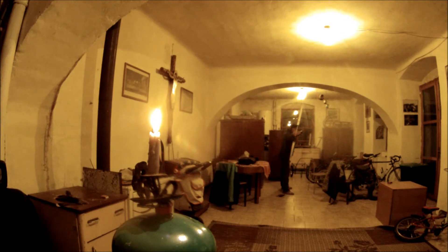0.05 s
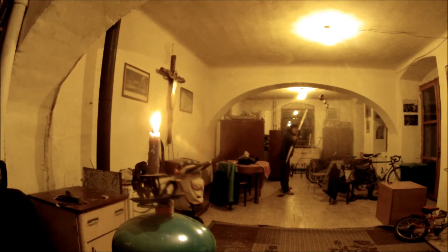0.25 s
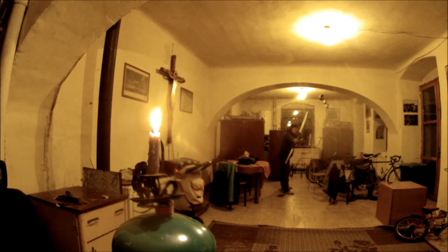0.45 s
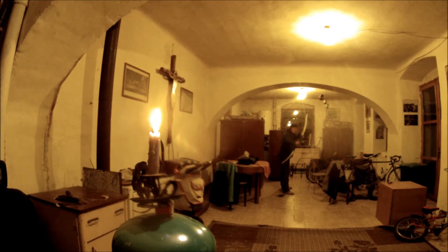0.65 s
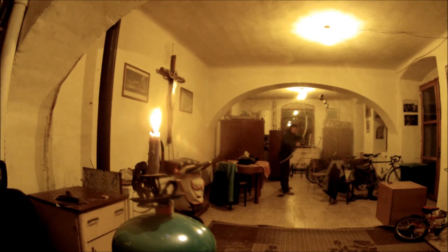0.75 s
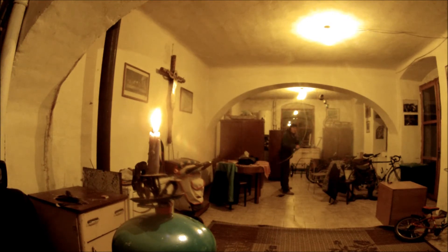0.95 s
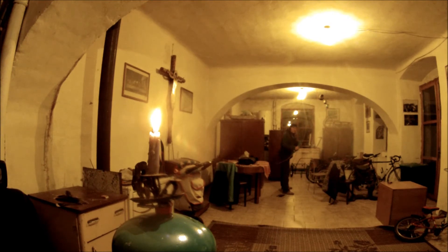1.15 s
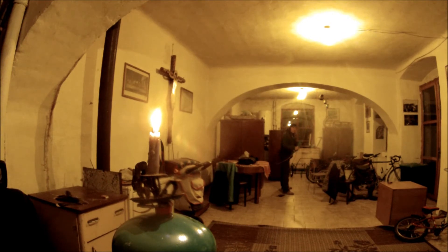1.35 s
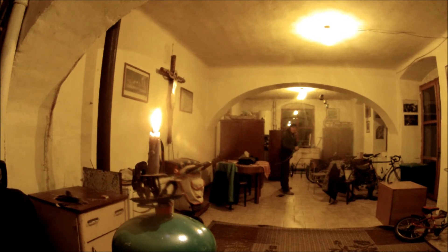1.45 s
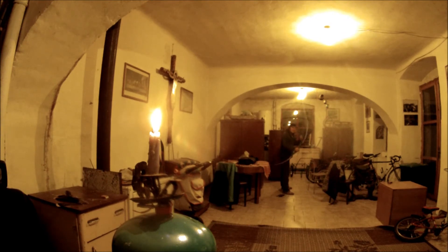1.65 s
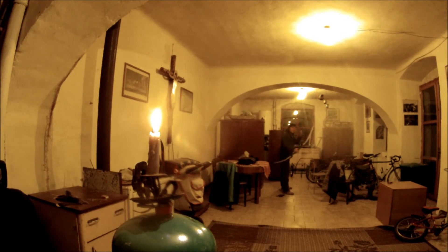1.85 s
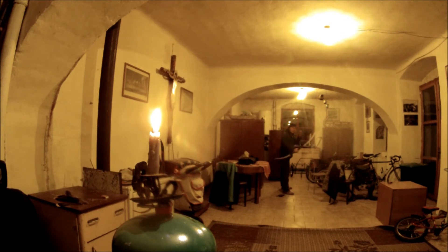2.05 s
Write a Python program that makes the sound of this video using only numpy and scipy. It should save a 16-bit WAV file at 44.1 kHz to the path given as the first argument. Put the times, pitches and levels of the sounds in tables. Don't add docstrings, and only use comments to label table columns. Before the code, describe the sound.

An arrow hits a padded target close to the microphone at about 0.23 s: a violent, clipped crack with a brief hollow boom. Just before, from 0.05 s, a distant bowstring slaps, the shaft rings and limbs knock softly. The vaulted room's echo fades over roughly half a second into low air murmur. Soft low footfalls come around 1.1-1.4 s, then faint cloth rustles and shoe scuffs at 1.5-2.0 s. Gritty, lo-fi camera sound.

```python
import sys
import numpy as np
from scipy import signal
from scipy.fft import rfft, irfft
from scipy.io import wavfile
from scipy.ndimage import uniform_filter1d

SR = 44100
rng = np.random.default_rng(int(sys.argv[2]) if len(sys.argv) > 2 else 0)


def ratio_of_db(decibels):
    return 10 ** (np.asarray(decibels, float) / 20)


def dump(signal):
    limited = np.clip(np.atleast_2d(signal).T, -1, 1)
    pcm = np.round(limited * 32767).astype(np.int16)
    wavfile.write(sys.argv[1], SR, pcm)


N = 92610
T = np.arange(N) / SR
HIT_S, HIT_PUSH_S = .2317, .0027


def noise():
    return rng.standard_normal(N)


def level(x, db):
    return x * ratio_of_db(db) / np.sqrt(np.mean(x ** 2))


def unit_energy(x):
    return x / np.sqrt(np.sum(x ** 2))


def colour(x, table):
    hz = np.maximum(np.fft.rfftfreq(len(x), 1 / SR), 1)
    table_hz, table_db = np.array(table).T
    gain_db = np.interp(np.log(hz), np.log(table_hz), table_db)
    return irfft(rfft(x) * ratio_of_db(gain_db), len(x))


def band(x, hz, width_hz):
    return signal.lfilter(*signal.iirpeak(hz, hz / width_hz, fs=SR), x)


def band_twice(x, hz, width_hz):
    return band(band(x, hz, width_hz), hz, width_hz)


def gate(start_s, length_s, fall=.3, rise=.056):
    u = (T - start_s) / length_s
    return np.clip(u / rise, 0, 1) * np.exp(-np.maximum(u - 1, 0) / fall)


def decay(t, t60_s):
    return np.exp(-np.log(1000) * t / t60_s)


def click(start_s):
    return np.sinc((T - start_s) * SR)


def ring(push, modes):
    body = sum(ratio_of_db(db) * np.sin(2 * np.pi * hz * T) * decay(T, t60_s) for hz, db, t60_s in modes)
    return signal.fftconvolve(push, body)[:N]


def walk(rate_hz):
    k = int(SR / rate_hz)
    return level(uniform_filter1d(uniform_filter1d(noise(), k), k), 0)


def rattle(start_s, length_s, spread_db=5):
    clicks = noise() * ratio_of_db(spread_db * noise())
    since = np.maximum(T - start_s, 0)
    return unit_energy(clicks * (T >= start_s) * np.exp(-(since / length_s) ** 2))


# (t after hit/ms, level/dB)
BITE_JOLTS = [
    (0, -7.5),
    (.25, 3),
    (1.1, -1.5),
    (1.9, -8),
    (2.7, -12.5),
    (3.3, -5),
    (4.4, -15),
]
# (f/Hz, level/dB, t60/s)
TARGET_MODES = [(764, -3, .018), (1520, -1, .011), (1950, -3, .012), (2700, -9, .01), (3700, -9, .013),
                (4350, -14, .01), (5110, -7, .012)]
# (f/Hz, level/dB, t60/s)
PAD_MODES = [(227.5, -10, .06), (300, -22, 0.15), (130, -24.5, .05), (840, -10.5, .03), (1674, -5, .014),
             (3590, -11.5, 0.013), (993.6, -17, .04), (570, -18.5, 0.085), (2550, -5.5, 0.011),
             (896, -17.5, 0.12)]
BITE_DB, CRACK_DB, HIT_LOW_HZ = -4, 2.5, 117


def hit():
    jolts = 0
    for k, (ms, db) in enumerate(BITE_JOLTS):
        jolts = jolts + (-1) ** k * ratio_of_db(db) * click(HIT_S + ms / 1000)
    bite = ratio_of_db(BITE_DB) * ring(jolts, TARGET_MODES)
    crack = ratio_of_db(CRACK_DB) * 10 * band(rattle(HIT_S, HIT_PUSH_S), 2500, 2700)
    high_pass = signal.butter(2, HIT_LOW_HZ, "high", fs=SR, output="sos")
    return signal.sosfilt(high_pass, bite + crack) + ring(click(HIT_S), PAD_MODES)


# (t/s, level/dB, length/s)
SLAP_BURSTS = [
    (.053, -41, 0.015),
    (0.068, -32, 0.024),
    (.095, -40, 0.024),
    (.118, -39, 0.019),
]
# (f/Hz, level/dB)
SLAP_COLOUR = [(35, -34.5), (60, -7), (319, -10.5), (468, -7), (601, -17), (2440, -10), (2900, -14),
               (3580, -16), (5900, -10), (7670, -36.5), (13000, -120)]


def string_slap():
    slap = level(colour(noise(), SLAP_COLOUR), 0) * ratio_of_db(2.5 * walk(200))
    return slap * sum(ratio_of_db(db) * gate(s, length_s, rise=.24) for s, db, length_s in SLAP_BURSTS)


# (f/Hz, level/dB, t60/s)
SHAFT_MODES = [(3579.3, 3.5, .14), (2455, -4.5, .08), (1960, -0.5, 0.092), (3000, -7, 0.043),
               (4649, -8.5, 0.048), (5250, -11.5, 0.031), (1184, -12.5, 0.035)]
SHAFT_S, SHAFT_PUSH_S, SHAFT_DB = .0757, .0039, -34
SHAFT_FREE_S, SHAFT_LEFT_DB = .014, -13


def shaft_ring():
    pushes = click(SHAFT_S) + .77 * click(SHAFT_S + SHAFT_PUSH_S)
    left = ratio_of_db(SHAFT_LEFT_DB) * ratio_of_db(5 * walk(70))
    choke = np.maximum(gate(SHAFT_S, SHAFT_FREE_S, .15), left)
    return ratio_of_db(SHAFT_DB) * ring(pushes, SHAFT_MODES) * choke


# (t/s, level/dB, length/s, centre f/Hz)
LIMB_THUDS = [
    (.066, -43, 0.058, 130),
    (.084, -42.5, .014, 480),
    (.102, -36.5, .022, 465),
    (.104, -39.5, .006, 170),
    (0.127, -38.5, .01, 250),
    (0.156, -39, 0.0089, 249.4),
]


def limb_thuds():
    wood, out = noise(), 0
    for s, db, length_s, hz in LIMB_THUDS:
        out = out + level(band_twice(wood, hz, hz * .35), db) * gate(s, length_s, rise=.3)
    return out


def bow():
    return string_slap() + limb_thuds() + shaft_ring()


# (t/s, level/dB, f/Hz, t60/s, knock level/dB)
FOOTFALLS = [
    (1.108, -54, 35.2, .15, -62),
    (1.19, -47, 49, 0.1, -74),
    (1.266, -59, 42, 0.3, -44.5),
    (1.291, -34, 37.2, 0.3, -48.5),
    (1.346, -46, 66, 0.39, -50.5),
    (1.376, -37, 38, 0.2, -58),
    (1.402, -61, 60, 0.29, -57),
    (1.912, -61, 69.8, 0.18, -55),
]
# (f/Hz, level/dB)
KNOCK_COLOUR = [(30, -11), (60, 8), (130, -2.5), (230, -8.5), (400, -16), (560, -30), (750, -43),
                (6000, -90)]
KNOCK_S = .023


def footsteps():
    knock, out = level(colour(noise(), KNOCK_COLOUR), 0), 0
    for s, db, hz, t60_s, knock_db in FOOTFALLS:
        u = np.maximum(T - s, 0)
        thud = ratio_of_db(db) * np.sin(2 * np.pi * hz * u) * decay(u, t60_s)
        out = out + thud + ratio_of_db(knock_db) * knock * gate(s, KNOCK_S, .764)
    return out


# (t/s, level/dB)
SWAY_LEVEL = [(0, -77), (1.062, -69), (1.14, -52.5), (1.24, -57), (1.31, -55), (1.41, -43.5), (1.55, -48),
              (1.7, -53), (1.79, -54), (1.87, -49.5), (1.99, -45.5), (2.1, -45.5)]
SWAY_HZ = 25.5


def floor_sway():
    hz = SWAY_HZ * (1 + .05 * walk(6))
    tone = np.sin(2 * np.pi * np.cumsum(hz) / SR) * ratio_of_db(2.5 * walk(33))
    at_s, db = np.array(SWAY_LEVEL).T
    return np.sqrt(2) * tone * ratio_of_db(np.interp(T, at_s, db))


# (t/s, level/dB, length/s, main f/Hz, lower f/Hz)
SCUFFS = [
    (1.12, -64, .003, 3000, 1500),
    (1.38, -78, .04, 3500, 2500),
    (1.505, -64, .06, 3544, 2860),
    (1.6, -61.5, .05, 4000, 2778),
    (1.675, -59.5, .055, 4400, 2950),
    (1.74, -60, .06, 4150, 2494),
    (1.845, -55.5, 0.047, 2450, 1291),
    (1.905, -61, .05, 2550, 1250),
    (1.99, -56, 0.042, 2400, 1150),
    (2.028, -69.5, .07, 2500, 1200),
]
RUSTLE_WIDE_DB, RUSTLE_LOW_DB, RUSTLE_HIGH_DB = 4, -2, -2


def rustles():
    grain = noise() * ratio_of_db(.93 * walk(120))
    hiss = level(band(grain, 3300, 4100), RUSTLE_WIDE_DB)
    out = 0
    for s, db, length_s, hz, low_hz in SCUFFS:
        body = level(band_twice(grain, hz, 550), 0)
        body = body + level(band_twice(grain, low_hz, 500), RUSTLE_LOW_DB)
        body = body + level(band(grain, hz * 1.1, 400), RUSTLE_HIGH_DB)
        body = body * ratio_of_db(1.9 * walk(70)) * gate(s, length_s * .71, .45)
        out = out + ratio_of_db(db - 8.5) * gate(s, length_s, .4) * (body + hiss)
    return out


# (f/Hz, t60/s)
REVERB_T60 = [(60, 1.1), (150, 0.58), (300, 0.91), (700, 0.79), (1400, 0.76), (2500, 0.53), (5000, 0.52)]
# (f/Hz, width/Hz, level/dB)
STANDING_WAVES = [(127, 8.1, 3.5), (275.4, 44, 4), (294.3, 10, 4), (530, 41, 1.5), (800, 190, 5.5),
                  (1930, 130, 5)]
ROOM_RISE_S = .006


def room():
    table_hz, table_s = np.array(REVERB_T60).T
    out = 0
    for hz in 35 * 2 ** np.arange(0, 7.6, .5):
        t60_s = np.interp(np.log(hz), np.log(table_hz), table_s)
        out = out + band_twice(noise(), hz, hz / 2) * decay(T, t60_s)
    out = out * (1 - np.exp(-T / ROOM_RISE_S))
    peaks = sum((ratio_of_db(db) - 1) * band(out, hz, width_hz) for hz, width_hz, db in STANDING_WAVES)
    return unit_energy(out + peaks)


# (f/Hz, level/dB)
HIT_ECHO_COLOUR = [(30, -30.5), (120, -7), (300, -8), (450, -13), (780, -11.5), (1950, -15), (2900, -22),
                   (5300, -23)]


def echo_kick():
    kick = colour(click(HIT_S + HIT_PUSH_S), HIT_ECHO_COLOUR)
    return unit_energy(kick) * np.sqrt(.15 * SR)


# (f/Hz, level/dB per Hz)
AIR_COLOUR = [(18, -33), (30, -9), (129, -5), (176, -10), (319, -13.5), (416, -17), (542, -18.5),
              (1710, -25), (5900, -31), (7670, -63), (13000, -120)]
AIR_DB = -59.5


def air():
    return level(colour(noise(), AIR_COLOUR), AIR_DB) * ratio_of_db(.7 * walk(3.5))


BOW_WET_DB, ECHO_DB, RUSTLE_WET_DB = -11, -24.5, -6


def scene():
    shot, scuff = bow(), rustles()
    sent = ratio_of_db(BOW_WET_DB) * 2 * shot + ratio_of_db(ECHO_DB) * echo_kick() + ratio_of_db(RUSTLE_WET_DB) * scuff
    wet = signal.fftconvolve(sent, room())[:N]
    return (hit() + shot + footsteps() + floor_sway() + scuff + wet + air())[None]


def band_limit(x):
    return signal.sosfilt(signal.butter(12, 16450, fs=SR, output="sos"), x)


DUCK_DB, DUCK_BACK_S = -7.5, .16
EDGE_HZ, TOP_HZ = 5650, 15250


def record(dry):
    since = T - HIT_S - 3.2 * HIT_PUSH_S
    duck = np.clip(since * 300, 0, 1) * np.clip(1 - since / DUCK_BACK_S, 0, 1)
    low_pass = signal.butter(6, EDGE_HZ, fs=SR, output="sos")
    x = signal.sosfilt(low_pass, dry[0] * ratio_of_db(DUCK_DB * duck))
    slow = np.clip(signal.resample_poly(x, 40, 147), -1, 1)
    held = signal.resample_poly(np.repeat(slow, 4), 147, 160)
    top = signal.ellip(10, .3, 60, TOP_HZ, fs=SR, output="sos")
    mix = signal.sosfilt(top, held)[None, :N]
    return band_limit(mix)


dry = scene()
out = record(dry)
dump(out)
```